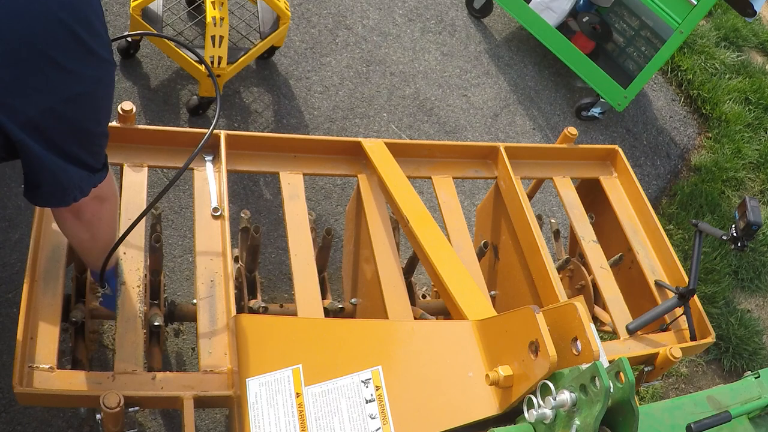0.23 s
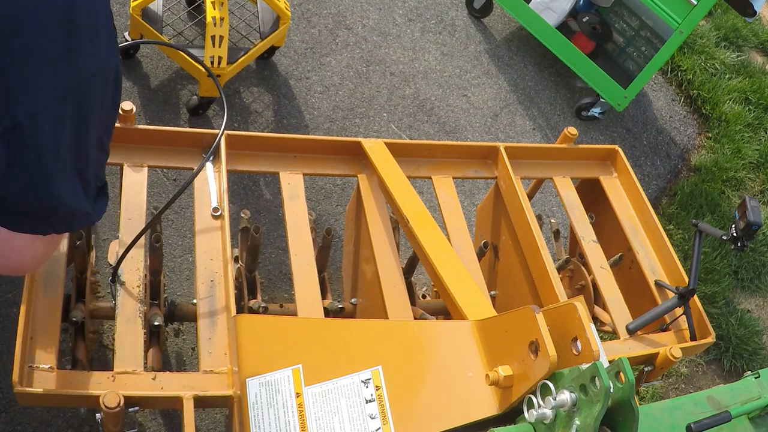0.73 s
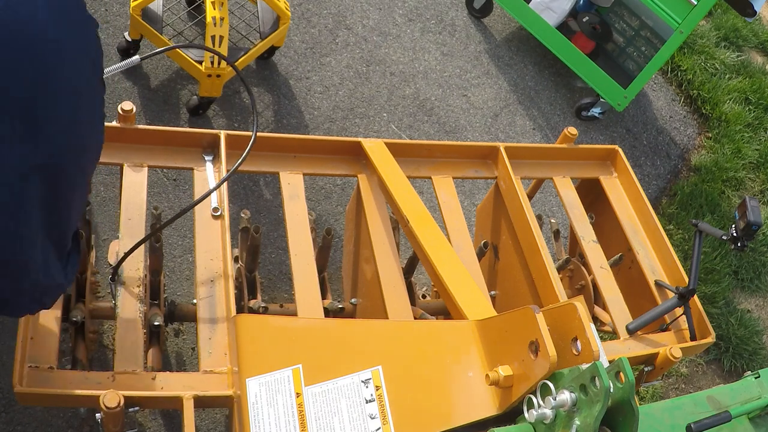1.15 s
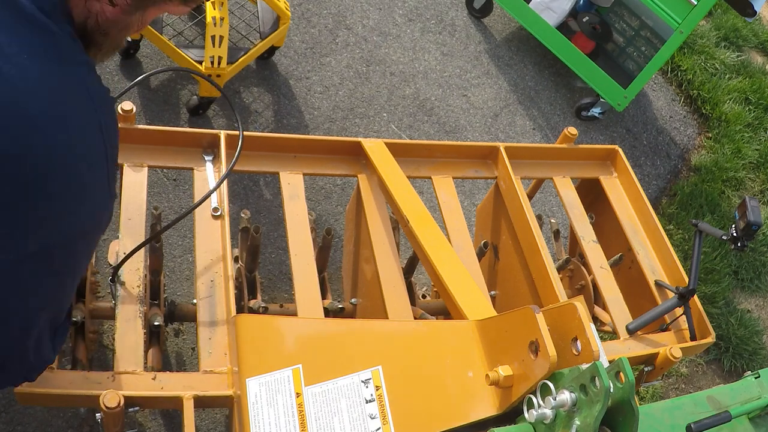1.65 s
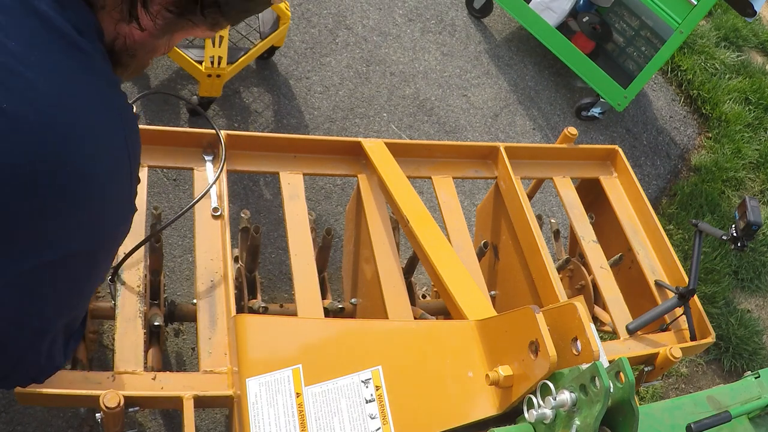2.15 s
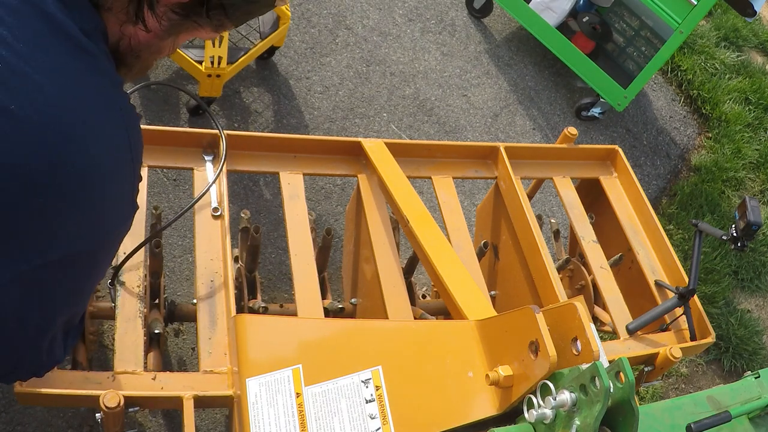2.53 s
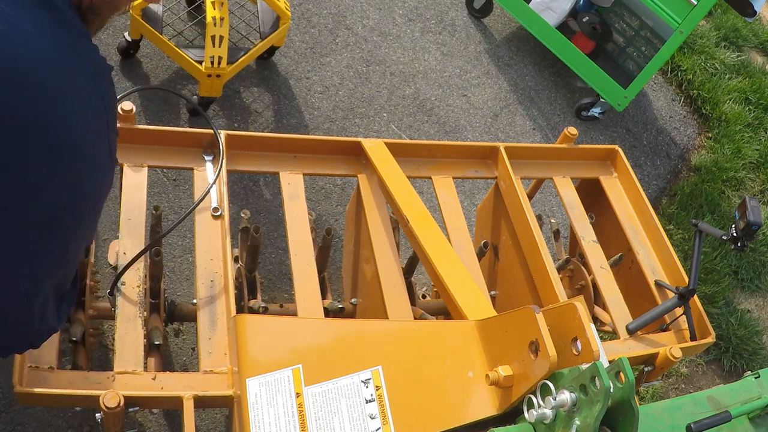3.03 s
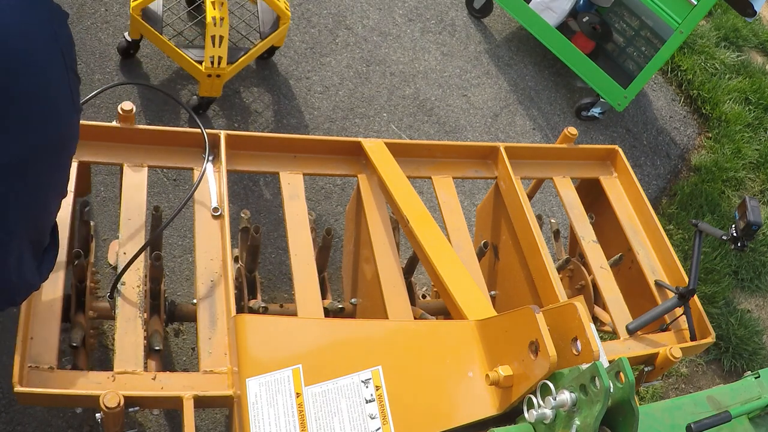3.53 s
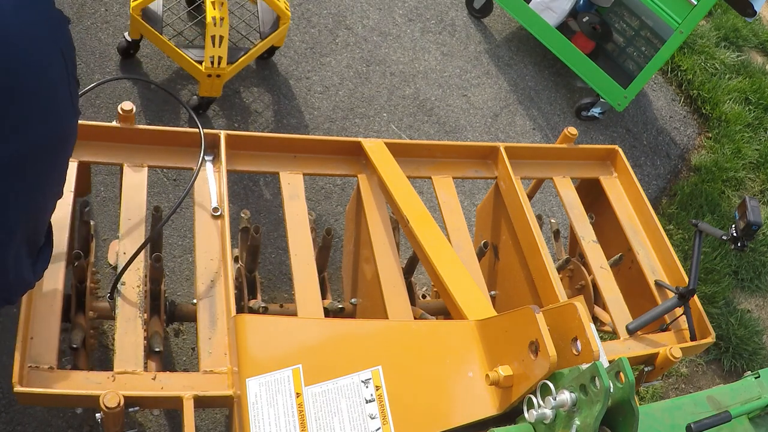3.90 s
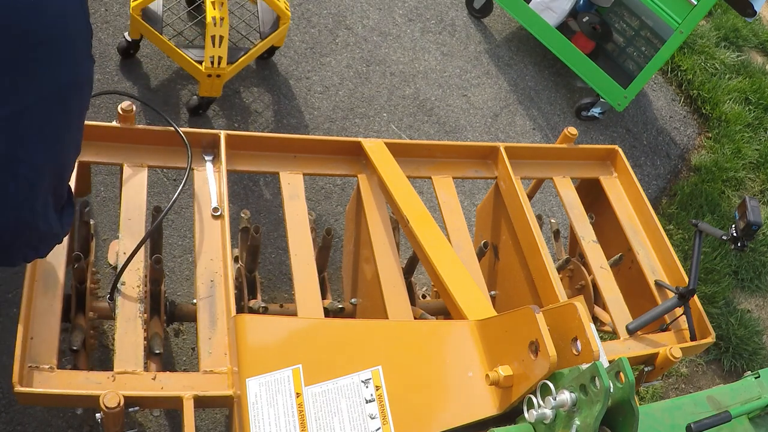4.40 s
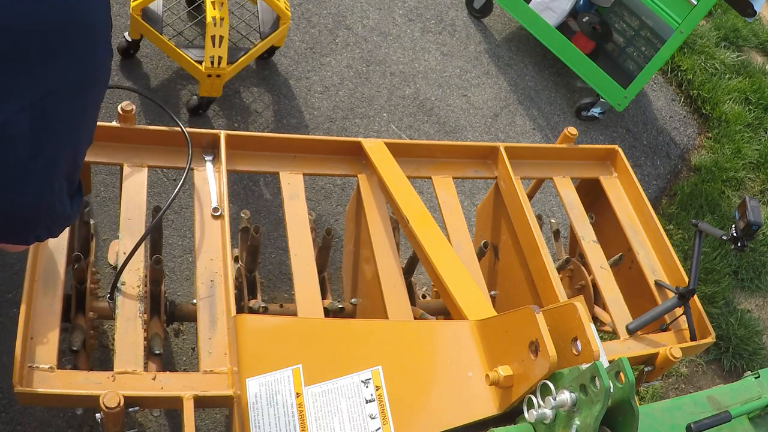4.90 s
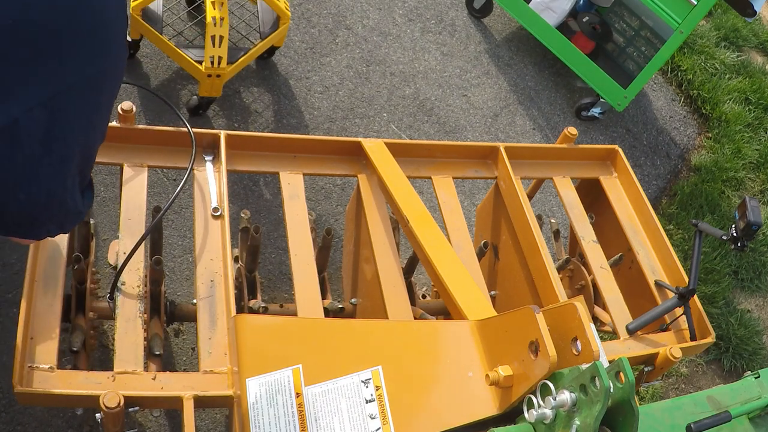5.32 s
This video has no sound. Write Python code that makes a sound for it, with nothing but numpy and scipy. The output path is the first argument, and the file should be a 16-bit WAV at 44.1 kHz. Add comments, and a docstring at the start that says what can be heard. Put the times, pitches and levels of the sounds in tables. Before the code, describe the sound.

A far mower drones low and steady throughout, around 140 Hz with slowly wavering strength, over soft open-air noise. From 0.2 to 1.9 seconds there are only very faint, short, grainy rustles of a hose being handled. At 1.9 a switch snaps and a close cordless grease gun spins up quickly with a small rising squeal. Its gearbox rattles coarsely, with growl and whine above. From about 2.1, piston strokes arrive every 0.2 seconds: each makes the gears grind louder, squeal hoarsely and sag in pitch, then recover. The sag deepens slightly as the fitting fills. Released at 4.0, the motor coasts down within a fraction of a second, leaving the mower hum. At 4.6 a softer click starts a second burst, with strokes from 4.8 still pulsing until the end at about 5.5, cut off while running. Dry outdoor sound, short metallic scatter, little stereo width.

```python
"""Outdoors on asphalt, a cordless grease gun pumps in two bursts into a fitting on a steel disc harrow.
Each piston stroke drags the motor down: the gears grind harder and squeal, then the whine climbs again.
One motor phase drives its knocks, whine, growl and squeal; shaped noise and resonances give the body.
A far mower hums throughout as a stack of wavering tones over a bed of noise, and the hose rustles
faintly, in short grainy bursts, before the trigger is pulled."""
import sys
import numpy as np
from scipy import signal
from scipy.fft import rfft, irfft
from scipy.io import wavfile
from scipy.ndimage import map_coordinates

SR = 44100
rng = np.random.default_rng(int(sys.argv[2]) if len(sys.argv) > 2 else 0)


def to_wav(sig):
    """Store sig (one row per channel, or 1-D mono) as 16-bit WAV at the path in sys.argv[1].

    Samples outside -1..1 are clipped; the rate is SR.
    """
    pcm = np.clip(np.atleast_2d(sig), -1, 1) * 32767
    pcm = np.round(pcm).astype(np.int16)
    wavfile.write(sys.argv[1], SR, pcm.T)  # frames by channels


N = 244755
TIME = np.arange(N) / SR   # s
SIZE = 2 ** 19   # transform length, samples
HZ = np.maximum(np.arange(SIZE // 2 + 1) * SR / SIZE, 1)   # transform frequencies, kept off zero

# In a noise colour only the shape counts: its levels are relative, per Hz.
# mower speed before hunting: [t/s, blade passes per s]
BLADE_RATE = [(0.0, 71.3), (0.04, 70.5), (2.74, 69.3), (4.58, 71.0), (5.55, 70.8)]
# mower drone at twice the blade rate: [t/s, level/dB]
DRONE = [(0.0, -45), (0.36, -47.5), (0.45, -61), (0.71, -45.5), (1.68, -39.5), (1.81, -45), (2.19, -39.5),
         (2.81, -48.5), (3.23, -40), (4.24, -55.5), (4.79, -41), (5.55, -50)]
# rest of the mower's hum: [multiple of the blade rate, level/dB, roughness 0-1]
HUM = [(1, -51.5, 0.45), (1.238, -51.5, 0.1), (1.601, -63.5, .6), (2.476, -45.5, 0.71), (3, -41.5, 0.46),
       (3.2, -46.5, 0.28), (3.714, -48, 0.25), (4, -45, 0.44), (4.96, -56, 0.71), (6, -58, 0.4)]
# colour of the open air: [f/Hz, level/dB]
YARD = [(22, -24), (40, -30.5), (64, -16), (130, -5.5), (216, -14), (290, -3), (380, -14.5), (500, -13),
        (1000, -19), (2300, -26), (3700, -30.5), (5800, -41.5), (7400, -48.5), (9000, -74), (11000, -56),
        (13500, -75)]
# hose and sleeve rustles: [t/s, relative level/dB, length/s]
RUSTLES = [(0.192, -71, .012), (.535, -63, 0.044), (0.588, -59, 0.0082), (0.897, -60.5, 0.019),
           (1.055, -64, 0.019), (1.423, -62, 0.01), (1.616, -59, 0.0083), (1.661, -55, .02),
           (1.862, -59, .003)]
# colour of the rustles: [f/Hz, level/dB]
RUSTLE_COLOUR = [(800, -10), (2500, 3.5), (5500, -2.5), (7000, -5.5), (8500, -18), (11000, -12.5),
                 (13500, -33)]
# trigger pulls: [pressed t/s, released t/s, spin-up/s, drive level/dB, click level/dB,
#                 relative start-up squeal level/dB]
TRIGGER = [(1.911, 4.024, .042, 0, -20, -22), (4.61, 5.7, .039, .2, -35, -27)]
# colour of the trigger click: [f/Hz, level/dB]
SWITCH = [(300, -19), (900, 3), (1500, 3.5), (2200, 0.5), (3000, 3), (3450, 0), (3850, 12), (4300, -5),
          (4800, -6), (6500, -23), (8500, -43), (13000, -42)]
# piston meets the grease: [t/s, strain level/dB, relative squeal level/dB, relative growl level/dB,
#                           growl brightness/dB per octave]
STROKES = [(2.088, 3.5, -31, -27.5, 0), (2.303, 2, -30.5, -25, -7), (2.514, 3, -29.5, -28, 10),
           (2.724, 4.5, -31.5, -26.5, -10), (2.932, 4.5, -32, -27.5, -6), (3.141, 5, -33, -28.5, -12),
           (3.353, 4.5, -35, -28.5, -9), (3.565, 5, -34, -29.5, 1), (3.777, 4, -34.5, -31, 13),
           (3.987, 5.5, -39, -28, -10), (4.803, 5.5, -36.5, -27, 9), (5.015, 5, -35, -27, 5),
           (5.226, 4, -34, -28, 5), (5.436, 4, -32.5, -26.5, -2)]
# colour of the gearbox rattle: [f/Hz, level/dB]
RATTLE = [(30, -41), (130, -3.5), (300, -6), (400, 0.5), (490, -6), (620, 1), (1600, -1), (2500, 0),
          (3600, 0.5), (4700, -4.5), (5600, -6), (6700, -11.5), (8200, -28), (10700, -22.5), (12000, -23),
          (13500, -41)]
# gearbox housing resonances: [f/Hz, width/Hz, lift/dB]
HOUSING = [(1706, 55, -6), (2220, 56, 0.5), (2545, 170, 4.5), (2680, 98, 0.5), (3046, 260, 3),
           (3820, 110, 6.5)]
# growl tones: [multiple of the motor speed, relative level/dB running free, the same dragged down,
#               roughness, clipped to 0-1]
GROWL_TONES = [(2.7, -6.5, -4.5, 0.76), (3, -11, -3.5, 0.4), (3.36, -15, -15, 1.06), (3.72, -24.5, -5, 0.6),
               (3.94, -4.5, -3, 0)]
# pump body resonances: [f/Hz, width/Hz, relative level/dB]
GROWL_MODES = [(842, 60, 0), (937, 12.3, 9.5), (1124, 59, 1.5), (1409, 121, -0.5)]
# whine tones: [multiple of the motor speed, relative level/dB running free, the same dragged down,
#               roughness 0-1]
GEAR_TONES = [(1, -42.5, -58, 0.13), (1.25, -49, -42.5, 0.53), (2, -53.5, -41, 0.5), (5, -44.5, -38, 0.4),
              (6.8, -47, -36, 1), (7, -42, -65, 0.94), (8.72, -43, -67, 0.3), (11.98, -31.5, -34, 0.35),
              (14.98, -42, -47, 0.4)]
# stereo width: [f/Hz, side minus mid level/dB]
WIDTH = [(60, -53), (300, -37), (1200, -61), (4000, -55.5), (7300, -30.5), (13000, -6.5)]

MOTOR_HZ = 357.05   # free-running turns per second
KNOCKS_PER_TURN = 3
MOTOR_WANDER, MOTOR_WANDER_RATE = .0028, 16   # the load is never quite even: share of the speed; changes per s
# each stroke slows the motor, more so as the fitting fills
SLOWING_EMPTY, SLOWING_FULL, FILL_STROKES = .11, .135, 3.5   # shares of the speed; strokes it takes to fill
SLOWEST_AFTER_S = .05   # from contact to the lowest speed
STRAIN_ATTACK_S, STRAIN_HOLD_S, STRAIN_RELEASE_S = .02, 0.033, 0.087   # the strain is full at contact
IDLE_GROWL_DB = -34.5   # relative growl level at the first pull, before the pump has grease to push
CUTOFF_HZ = 13600


def from_db(db):
    """Decibels to gain."""
    return 10 ** (np.asarray(db) / 20)


def rms_one(x):
    """Scale to unit power."""
    return x / np.sqrt(np.mean(x ** 2) + 1e-20)


def drift(rate):
    """Smooth chance through `rate` random points a second; spread 1."""
    points = rng.standard_normal(2 ** 13)
    curve = map_coordinates(points, [TIME[::2 ** 4] * rate], order=3, mode="wrap")
    return rms_one(curve)[np.arange(N) // 2 ** 4]   # one value held per 16 samples


def smooth(x, seconds):
    """One-pole lag."""
    r = np.exp(-1 / (seconds * SR))
    return signal.lfilter([1 - r], [1, -r], x + 1e-18)


def spectrum_db(points):
    """A short spectrum joined on a log-frequency axis."""
    hz, db = np.transpose(points)
    return np.interp(np.log(HZ), np.log(hz), db)


def colour(x, db):
    """Causal (minimum-phase) filter that keeps the power of white noise."""
    cepstrum = irfft(np.log(rms_one(from_db(db))))
    cepstrum[1:SIZE // 2] *= 2
    cepstrum[SIZE // 2 + 1:] = 0
    return irfft(rfft(x, SIZE) * np.exp(rfft(cepstrum)))[..., :N]


def tone(turns, rough, rate):
    """A partial of about unit power that wavers in strength and phase, the more so the rougher it is."""
    rough = np.clip(rough, 0, 1)
    steady = np.sqrt(2 - 2 * rough ** 2)
    waver = steady + rough * smooth(drift(rate) + 1j * drift(rate), 0.0025)
    return np.real(waver * np.exp(2j * np.pi * (turns + rng.random())))


def per_stroke(values, delay_s):
    """Glide from each stroke's value to the next, reaching it `delay_s` after contact."""
    return np.interp(TIME, np.array(STROKES)[:, 0] + delay_s, values)


def mower(waver_rate=6, drone_rough=0.15, hunting=.002, hunting_rate=5):
    """Blade and engine tones of a far mower, wavering in the air; its speed hunts a little."""
    blade_rate = np.interp(TIME, *np.transpose(BLADE_RATE)) * (1 + hunting * drift(hunting_rate))
    turns = np.cumsum(blade_rate) / SR
    drone_level = from_db(np.interp(TIME, *np.transpose(DRONE)))
    drone = drone_level * tone(2 * turns, drone_rough, waver_rate)
    hum = sum(from_db(db) * tone(multiple * turns, rough, waver_rate) for multiple, db, rough in HUM)
    return drone + hum


def yard(level_db=-46):
    """The mower's rush and the open air, as steady coloured noise."""
    return from_db(level_db) * colour(rng.standard_normal(N), spectrum_db(YARD))


def rustles(grain_db=3, level_db=1.0):
    """Short grainy rubs while the hose is handled: swells of noise whose strength flutters."""
    level = sum(from_db(db + level_db) * np.exp(-((TIME - s) / length) ** 2 / 2) for s, db, length in RUSTLES)
    grain = rms_one(rng.standard_normal(N) * from_db(grain_db * drift(400)))
    return colour(level * grain, spectrum_db(RUSTLE_COLOUR))


def reflections(x, wet_db=-13, t60=0.11):
    """A short scatter from the steel frame and the ground: a decaying noise tail after a 3 ms gap."""
    t = TIME[:SR // 3]
    tail = rng.standard_normal(len(t)) * from_db(-60 * t / t60) * (t > .003)
    return from_db(wet_db) * signal.fftconvolve(x, tail / np.linalg.norm(tail))[:N]


def switch_click(click_s=0.0051):
    """Each trigger pull snaps the switch: a burst of coloured noise that dies away at once."""
    snap = sum(from_db(db) * (TIME > on) * np.exp(-np.abs(TIME - on) / click_s) for on, *_, db, _ in TRIGGER)
    return colour(snap * rng.standard_normal(N), spectrum_db(SWITCH))


def motion(coast_s=.11, fade_s=0.026, bite_s=0.0055, prime_s=.17, unprimed_db=-2, unprimed_slowing=.06,
           inrush_db=4):
    """Motor speed (share of free running), drag (0 free, about 1 slowest), strain (dB) and drive (gain)."""
    slowing, drag, strain_db, speed, drive = np.zeros((5, N))
    strain_times = [-STRAIN_ATTACK_S, 0, STRAIN_HOLD_S, STRAIN_HOLD_S + STRAIN_RELEASE_S]
    for done, (s, db, *_) in enumerate(STROKES):
        age = np.maximum(TIME - s, 0) / SLOWEST_AFTER_S
        sag = (age * np.exp(1 - age)) ** 2   # a quick drop and a slow recovery
        drag += sag
        slowing += sag * (SLOWING_FULL + (SLOWING_EMPTY - SLOWING_FULL) * np.exp(-done / FILL_STROKES))
        strain_db += db * np.interp(TIME - s, strain_times, [0, 1, 1, 0])
    for on, off, spin_up_s, db, *_ in TRIGGER:
        running, coasting = np.maximum(TIME - on, 0), np.maximum(TIME - off, 0)
        starting = np.exp(-(running / prime_s) ** 2)   # the pump takes a stroke to reach speed and force
        spun_up = 1 - np.exp(-running / spin_up_s)
        strain_db += inrush_db * np.sin(np.pi * spun_up)   # a starting motor delivers most power at half speed
        speed += spun_up * (1 - unprimed_slowing * starting) * np.exp(-coasting / coast_s)
        bite = 1 - np.exp(-running / bite_s)
        drive += from_db(db + unprimed_db * starting) * bite * np.exp(-coasting / fade_s)
    speed *= 1 - slowing + MOTOR_WANDER * drift(MOTOR_WANDER_RATE)
    return speed, drag, strain_db, drive


def spread(x, travel_s=0.002977):
    """Bending waves carry the highs through the housing faster than the lows, which smears each knock."""
    phase = 4 * np.pi * travel_s * np.sqrt(HZ * MOTOR_HZ)   # travel_s is the delay at MOTOR_HZ
    return irfft(rfft(x, SIZE) * np.exp(-1j * phase))[:N]


def rattle(turns, scatter_db=4.5, jitter=.016, knock_db=-6.0, tight_spot_db=7, loose_db=-8, hiss_db=-4,
           loose_per_s=1800, flutter_db=1.0):
    """The pinion knocks, hardest at its tight spot; loose tooth contacts and sliding hiss fill the gaps."""
    tooth = np.floor(KNOCKS_PER_TURN * (turns + jitter * drift(700)))
    contact = np.flatnonzero(np.diff(tooth) > 0)
    scatter = scatter_db * np.clip(rng.standard_normal(N), -1.5, 1.5)
    tight_spot = tight_spot_db * (tooth % KNOCKS_PER_TURN == 0)
    knocks = np.zeros(N)
    knocks[contact] = from_db(scatter + tight_spot)[contact]
    # unit power at the free-running knock rate
    knocks /= np.sqrt(np.mean(knocks[contact] ** 2) * KNOCKS_PER_TURN * MOTOR_HZ / SR)
    knocks = spread(knocks - smooth(knocks, 0.006))
    loose = rms_one((rng.random(N) < loose_per_s / SR) * rng.standard_normal(N))
    hiss = rng.standard_normal(N)
    force = from_db(knock_db) * knocks + from_db(loose_db) * loose + from_db(hiss_db) * hiss
    return force * from_db(flutter_db * drift(70))


def housing_db():
    """The lift or dip that the housing's resonances give at each frequency."""
    return sum(db / (1 + (2 * (HZ - hz) / width) ** 2) for hz, width, db in HOUSING)


def resonances(modes):
    """Power gain of a few resonances at each frequency."""
    return sum(from_db(db) ** 2 / (1 + ((HZ / hz - hz / HZ) * hz / width) ** 2) for hz, width, db in modes)


def growl(turns, speed, drag, force, coupling=0.33, tones_db=-2, noise_db=-6.0, waver_rate=42, delay_s=.07,
          take_up_s=0.028, speed_power=3.7):
    """Low gear tones swell as they sweep the pump body's resonances, which the rattle rings too."""
    contact, _, _, stroke_db, brightness = np.transpose(STROKES)
    body_db = 10 * np.log10(resonances(GROWL_MODES))
    tilt_db = per_stroke(brightness, delay_s)   # per octave above the knock rate
    tones = 0
    for multiple, free_db, dragged_db, rough in GROWL_TONES:
        swell_db = coupling * np.interp(multiple * MOTOR_HZ * speed, HZ, body_db)
        swell_db = swell_db + tilt_db * np.log2(multiple / KNOCKS_PER_TURN)
        level_db = free_db + (dragged_db - free_db) * drag + swell_db
        tones = tones + from_db(level_db) * tone(multiple * turns, rough, waver_rate)
    ringing = rms_one(colour(force, body_db))
    loaded = np.clip((TIME - contact[0]) / take_up_s, 0, 1)
    level = from_db(IDLE_GROWL_DB + loaded * (per_stroke(stroke_db, delay_s) - IDLE_GROWL_DB))
    level *= np.minimum(speed / (1 - SLOWING_FULL), 1) ** speed_power   # it dies away below working speed
    return level * (from_db(tones_db) * tones + from_db(noise_db) * ringing)


def whine(turns, speed, drag, waver_rate=55, first_db=-0.5, last_db=2.0, unprimed_db=-7, prime_s=0.11,
          wander_db=0.9):
    """Motor tones glide with the speed; faint just after each pull, they grow as the fitting fills."""
    tones = sum(from_db(free_db + (dragged_db - free_db) * drag) * tone(multiple * turns, rough, waver_rate)
                for multiple, free_db, dragged_db, rough in GEAR_TONES)
    starting = sum((TIME > on) * np.exp(-((TIME - on) / prime_s) ** 2) for on, *_ in TRIGGER)
    filling_db = per_stroke(np.linspace(first_db, last_db, len(STROKES)), 0)
    return tones * speed ** 4 * from_db(filling_db + unprimed_db * starting + wander_db * drift(18))


def squeal(turns, multiple=18, delay_s=0.026, length_s=0.017, start_delay_s=0.044, start_length_s=0.02,
           start_rough=0.86, waver_rate=340, sideband_db=-6):
    """Torque makes the gears sing high with the motor: a chirp up at each start, a hoarse fall at each stroke."""
    level = sum(from_db(db) * np.exp(-((TIME - s - delay_s) / length_s) ** 2 / 2) for s, _, db, *_ in STROKES)
    start_level = sum(from_db(db) * np.exp(-np.abs(TIME - on - start_delay_s) / start_length_s)
                      for on, *_, db in TRIGGER)
    # once-a-turn wobble
    sidebands = tone((multiple - 1) * turns, 0.98, waver_rate) + tone((multiple + 1) * turns, 0.97, waver_rate)
    hoarse = rms_one(tone(multiple * turns, 1, waver_rate) + from_db(sideband_db) * sidebands)
    return level * hoarse + start_level * tone(multiple * turns, start_rough, waver_rate)


def grease_gun(rattle_db=-30, squeal_db=-2):
    """Switch click, then gearbox rattle, growl, whine and squeal all driven by one motor."""
    speed, drag, strain_db, drive = motion()
    turns = np.cumsum(MOTOR_HZ * speed) / SR
    force = rattle(turns)
    strained = drive * from_db(rattle_db + strain_db) * force
    gearbox = colour(strained, spectrum_db(RATTLE) + housing_db())
    voices = growl(turns, speed, drag, force) + whine(turns, speed, drag) + from_db(squeal_db) * squeal(turns)
    return switch_click() + gearbox + drive * voices


def scene():
    """Mower and air behind, hose and gun near; the two sides differ only in phase, most in the treble."""
    far = mower() + yard()
    near = rustles() + grease_gun()
    mid = near + reflections(near) + far
    side = irfft(1j * rfft(mid, SIZE) * from_db(spectrum_db(WIDTH)))[:N]   # a quarter turn of phase
    return mid + side * np.array([[1], [-1]])


def record(dry, notch_hz=9030, notch_width_hz=550):
    """The microphone has a deep notch in the treble, from two passes of one filter; the top is cut."""
    notch = signal.iirnotch(notch_hz, notch_hz / notch_width_hz, fs=SR)
    notched = signal.lfilter(*notch, signal.lfilter(*notch, dry))
    top_cut = signal.ellip(12, .1, 90, CUTOFF_HZ, fs=SR, output="sos")
    return signal.sosfilt(top_cut, notched)


dry = scene()
out = record(dry)
to_wav(out)
```